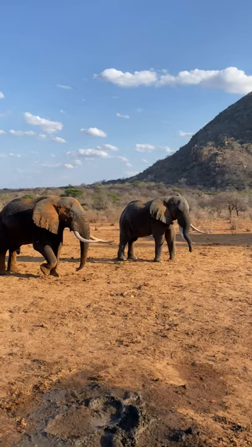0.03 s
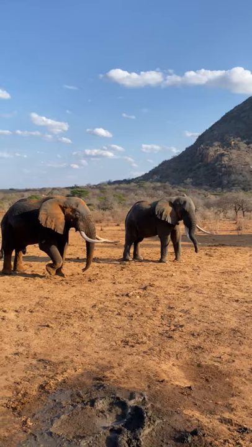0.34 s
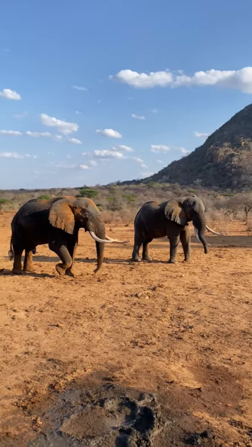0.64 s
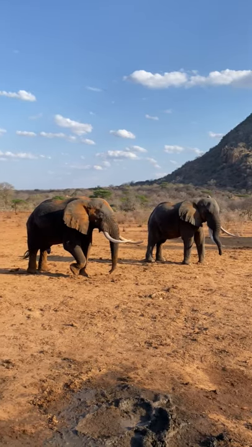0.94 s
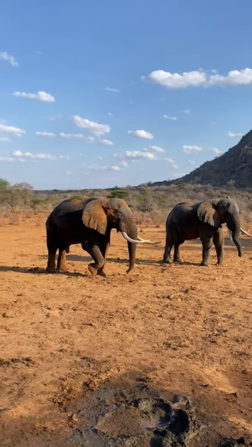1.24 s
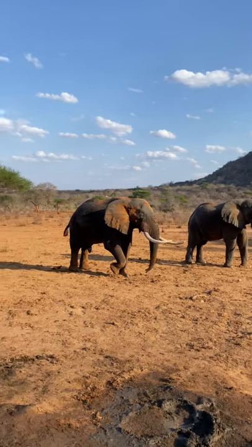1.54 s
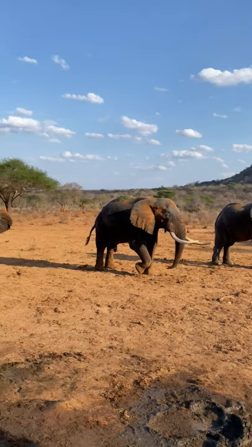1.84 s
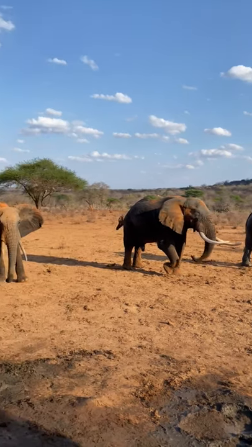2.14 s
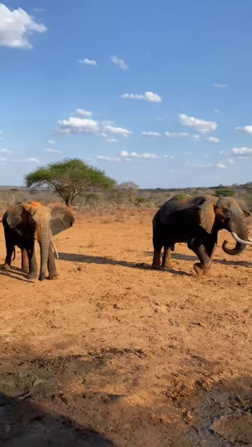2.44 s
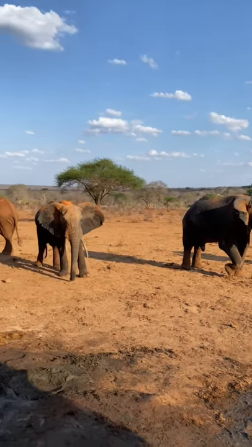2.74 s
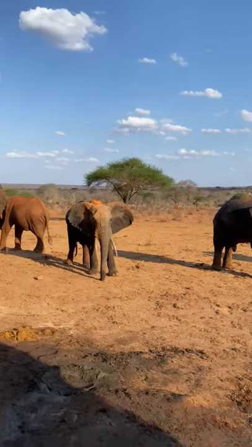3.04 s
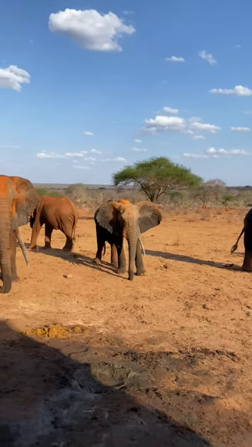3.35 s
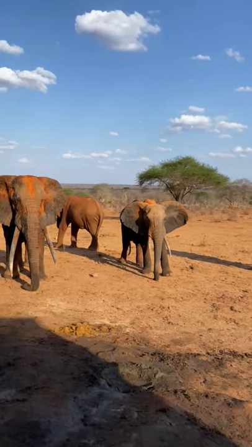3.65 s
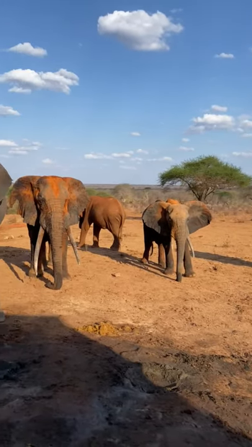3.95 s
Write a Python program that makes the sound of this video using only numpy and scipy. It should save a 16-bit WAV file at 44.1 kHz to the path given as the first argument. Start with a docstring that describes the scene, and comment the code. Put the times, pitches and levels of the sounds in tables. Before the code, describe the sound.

A steady stream of water splashes onto wet ground while wind buffets the microphone.

```python
"""The sound cuts in on a steady stream of water splashing onto wet ground in open, dry country with no walls to
echo: a fluttering spray of tiny impacts over a low churn of bubbles. From the start, gusts of wind buffet the
microphone. Single eddies soon thump it, heavier slaps of water land and a larger bubble plinks. From about 1.5
s small vortices rip across its two ports, and as it slowly turns the water grows brighter. One more bubble
plinks at the very end."""
import sys
import numpy as np
from scipy import signal
from scipy.fft import rfft, irfft
from scipy.io import wavfile

SR = 44100
rng = np.random.default_rng(int(sys.argv[2]) if len(sys.argv) > 2 else 0)


def transcribe(u):
    """Save the signal u as a 16-bit wav file named by the first command-line argument.

    u: samples, shape (n,) or (channels, n), limited to [-1, 1]; the rate is SR.
    q: integer samples, one column per channel.
    """
    v = np.clip(np.atleast_2d(u).T, -1, 1)
    q = np.round(v * 32767).astype(np.int16)
    wavfile.write(sys.argv[1], SR, q)


N = 176400
TIME, FREQS = np.arange(N) / SR, np.arange(N // 2 + 1) * SR / N


def from_db(db):
    """Decibels to gain."""
    return 10 ** (np.asarray(db) / 20)


def unit_rms(x):
    """Scale to unit rms."""
    return x / np.sqrt(np.mean(x ** 2) + 1e-20)


def automation(rows):
    """A control curve through (seconds, value) points."""
    return np.interp(TIME, *np.transpose(rows))


def over_hz(points):
    """A curve through (Hz, value) points across the spectrum, on a log axis."""
    hz, value = np.transpose(points)
    return np.interp(np.log(np.maximum(FREQS, 1)), np.log(hz), value)


def drift(rate_hz):
    """Smooth random modulation at unit rms."""
    return unit_rms(irfft(rfft(rng.standard_normal(N)) / (1 + (FREQS / rate_hz) ** 2), N))


def clicks(per_s, spread_db):
    """Random impacts, many small and a few large."""
    sizes = from_db(spread_db * np.minimum(rng.exponential(1, N), 4))
    return sizes * rng.choice([-1, 1], N) * (rng.random(N) < per_s / SR)


def grainy(per_s, spread_db, share):
    """Separate impacts carry a share of the power, over a smooth rush of countless small ones."""
    impacts = unit_rms(clicks(per_s, spread_db))
    return np.sqrt(share) * impacts + np.sqrt(1 - share) * rng.standard_normal(N)


def stereo(mid, side, correlation):
    """Left and right of a given correlation from two unrelated signals."""
    return np.sqrt((1 + correlation) / 2) * mid + np.sqrt((1 - correlation) / 2) * np.array([side, -side])


def bubbles(low_hz=380, high_hz=5500, pitches=36, ring_cycles=40):
    """Trapped air rings briefly, rising a little in pitch as it fades by 60 dB."""
    births = clicks(per_s=1000, spread_db=2)
    pitch_index = rng.integers(0, pitches, N)
    churn = np.zeros(N)
    for k, hz in enumerate(np.geomspace(low_hz, high_hz, pitches)):
        life = ring_cycles / hz
        t = np.arange(int(life * SR)) / SR
        ring = hz * np.sin(2 * np.pi * hz * t * (1 + 0.16 * t / life)) * np.exp(-np.log(1000) * t / life)
        churn += signal.oaconvolve(births * (pitch_index == k), ring)[:N]
    return unit_rms(churn) * np.sqrt(2 * high_hz / SR)


def flicker(sound, depth_db=1.0):
    """Each of six overlapping octave bands flickers on its own."""
    spectra = rfft(sound)
    octave = np.log2(np.clip(FREQS, 500, 16000) / 500)
    bands = [irfft(spectra * np.maximum(1 - np.abs(octave - k), 0), N) for k in range(6)]
    return sum(band * from_db(depth_db * drift(rate_hz=30)) for band in bands)


def splash(flutter_db=1.1, surge_db=0.2):
    """Spray and bubbles pulse as the stream breaks into lumps, with slaps on top: two unrelated spectra."""
    flow = from_db(flutter_db * drift(rate_hz=70) + surge_db * drift(rate_hz=12))
    grains = np.zeros((2, N))
    for layer in grains:
        spray = grainy(per_s=5000, spread_db=0.5, share=0.38)
        layer += spray + from_db(-5.5) * bubbles()
    return rfft(flicker(flow * grains + slaps())) * np.sqrt(SR / 2)


# The water's tone and stereo image. Each row: frequency in Hz, level in dB per Hz, left minus right in dB,
# phase lead of the left in radians, correlation, then the dB and the radians of lead a full turn adds.
WATER_IMAGE = [ (103, -84, 9, 1.5, 0.6, -6, 0.35), (280, -62.5, 1.5, -0.56, 0.56, -3.5, 0.29),
               (450, -62.5, 4, -.5, 0.97, 4.5, 1.4), (610, -62, 5, -0.65, 0.36, -2, -0.21),
               (817, -67, 8, 0.5, 0.08, 7.5, 0.19), (1366, -68.5, -1, .5, 0.78, 4, 1.12),
               (1735, -71.5, -2, 1.25, 0.7, 1.5, -0.13), (2040, -74.5, -2.5, 2.5, 0.38, 6, -0.26),
               (2364, -67.5, 5.5, 3, 0.5, 3, 0.67), (3090, -65.5, 2.5, 3.0, 0.93, -1, 1.35),
               (3610, -68, -1.5, 4.5, 0.5, 0.5, 1.46), (4320, -65, -1, 6.5, 1, 0.5, 0.97),
               (4650, -65, 2, 6, 0.88, -1.8, 0.022), (5244, -69, -3, 7.5, 0.85, 0, 1.37),
               (5750, -72, 1.5, 8, 0.92, 7, 1.1), (6500, -79.5, -1, 9, 0.74, 6.5, 0.24),
               (7550, -85.5, -1, 8.6, .8, 10, 0), (8100, -84.5, 0, 9.42, 1, 2, 0),
               (9300, -81.3, 0, 9.42, 1, 4, 0), (11000, -85.3, 0, 9.42, 1, 11.5, 0),
               (12000, -89.5, 0, 9.45, .95, 11, .95), (14000, -94.3, 0, 10.6, .45, 9.3, .1),
               (15000, -97, 0, 11.4, .4, 2, 0), ]
# The microphone's slow turn. Each row: time in seconds, share of the full turn.
MIC_TURN = [(0, 0), (1.3, .02), (2.0, .13), (2.4, .28), (2.7, .48), (3.1, .7), (3.4, .93), (4, 1.05)]


def water():
    """The splash reaches the two ports of a turning microphone, crossfading to a brighter tone."""
    curves = [over_hz(np.array(WATER_IMAGE)[:, [0, k]]) for k in range(1, 7)]
    level_db, balance_db, lead, correlation, turn_db, turn_lead = curves
    sides = np.array([[.5], [-.5]])
    ahead = stereo(*splash(), correlation) * from_db(level_db + sides * balance_db)
    ahead *= np.exp(1j * sides * lead)
    turned = ahead * from_db(turn_db) * np.exp(1j * sides * turn_lead)
    turn = automation(MIC_TURN)
    return (1 - turn) * irfft(ahead, N) + turn * irfft(turned, N)


# The rumble's EQ. Each row: frequency in Hz, relative level in dB.
WIND_EQ = [(15, -35.5), (28, -36), (45, -1), (65, 5), (100, 4), (160, 1), (260, -2.5), (420, -7.5),
           (750, -19.5), (1300, -32.5), (3000, -108.5)]
# The rumble's stereo image. Each row: frequency in Hz, left-right correlation (1 is mono).
WIND_CORRELATION = [(50, 1), (130, 0.93), (300, 0.8), (800, 0.94)]
# The gusts, as a fader ride. Each row: time in seconds, level in dB before the trim.
GUST_RIDE = [(0.1, -35), (0.15, -38), (0.21, -31), (0.5, -34), (0.63, -30), (0.67, -24.5), (0.72, -32.5),
             (1.0, -30.5), (1.07, -31), (1.125, -22.5), (1.28, -26), (1.39, -27), (1.415, -30),
             (1.46, -19.5), (1.54, -31.5), (1.62, -28), (1.75, -32), (1.83, -39.5), (2.02, -23),
             (2.15, -39.5), (2.19, -19.5), (2.23, -32), (2.26, -23.5), (2.33, -46), (2.38, -29),
             (2.55, -45), (2.575, -28), (2.64, -23.5), (2.69, -34), (2.725, -24), (2.81, -37.5),
             (2.84, -27), (2.87, -37), (2.91, -28), (2.96, -37.5), (3.14, -31.5), (3.17, -38.5),
             (3.3, -30.5), (3.42, -29.5), (3.46, -29.5), (3.49, -26.5), (3.52, -29), (3.55, -36),
             (3.61, -31), (3.64, -30.5), (3.73, -26), (3.85, -30), (3.91, -23), (3.96, -36), (4.0, -33)]


def wind(trim_db=-0.5):
    """Eddies tumble over the ports: a lumpy rumble that swells with each gust."""
    mid, side = [rfft(grainy(per_s=380, spread_db=3, share=0.58)) for _ in range(2)]
    eddies = stereo(mid, side, over_hz(WIND_CORRELATION))
    rumble = irfft(eddies * from_db(over_hz(WIND_EQ)), N)
    return unit_rms(rumble) * from_db(trim_db + automation(GUST_RIDE))


def swing(start, db, hz, swell_cycles, sag):
    """A short swing of pressure swells and dies away, its log pitch sinking by sag per cycle."""
    cycles = np.log1p(sag * np.maximum((TIME - start) * hz, 0)) / sag
    age = np.minimum(cycles / swell_cycles, 20)
    envelope = from_db(db) * (age * np.exp(1 - age)) ** 2
    return envelope * np.sin(2 * np.pi * (cycles + rng.random()))


# Wind thumps. Each row: start in seconds, peak in dB, starting pitch in Hz, attack in cycles.
EDDY_THUMPS = [(.222, -15, 427, 0.42), (.367, -16.5, 450, 0.68), (.670, -21, 149, 0.7),
               (.945, -16.5, 310, 0.62), (1.120, -28, 262, 1.1), (1.158, -23.5, 220, 0.5),
               (1.185, -19.5, 380, 1.2), (1.254, -14.5, 189, 0.59), (1.380, -14.5, 148, 0.37),
               (1.447, -16.5, 570, 0.81), (1.461, -19, 220, 0.48), (1.473, -16, 380, .7),
               (1.560, -11.5, 484, 0.5), (1.679, -15, 523, 0.57), (2.175, -15.5, 200, 1.1),
               (2.255, -16, 313, 0.64), (2.593, -19, 344, 0.75), (2.626, -16.5, 300, 1.14),
               (2.678, -25, 380, 1.5), (2.714, -15.5, 258, 0.76), (3.251, -15.5, 483, 0.68),
               (3.303, -15, 273, 0.64), (3.450, -11.5, 320, 0.97), (3.468, -14, 110, 0.62),
               (3.486, -9, 183, 0.65), (3.631, -9.5, 350, 0.76), (3.645, -17, 119, 0.55),
               (3.678, -15.5, 288, 1.2), (3.723, -20, 380, 0.76), (3.738, -17.5, 220, 0.3),
               (3.903, -16.5, 128, 0.74)]


def thumps():
    """Single eddies thump the microphone, diving in pitch as they slow."""
    return sum(swing(*thump, sag=0.25) for thump in EDDY_THUMPS)


# Accents in the splash. Each row: start in seconds, level in dB over the spray before the low cut.
WATER_SLAPS = [(0.415, 9), (0.511, -7.5), (0.584, 9), (0.998, 5.5), (1.037, 6.5), (1.21, 8.5), (1.844, 4),
               (2.071, 0.5), (2.089, 9.5), (2.143, 0), (2.315, 3), (2.778, -1), (3.065, -0.5),
               (3.388, -0.5)]


def slaps(decay_s=0.007, low_cut_hz=2600):
    """Heavier slaps of water land as bright ticks of noise."""
    envelope = sum(from_db(db) * (TIME >= start) * np.exp(-np.abs(TIME - start) / decay_s)
                   for start, db in WATER_SLAPS)
    low_cut = signal.butter(2, low_cut_hz, "high", fs=SR, output="sos")
    return signal.sosfilt(low_cut, envelope * rng.standard_normal((2, N)))


# Bubble plinks. Each row: start in seconds, peak in dB, starting pitch in Hz, attack in cycles.
BUBBLE_PLINKS = [(.832, -27.5, 1750, 4.9), (3.972, -25.5, 1060, 6.6)]


def plinks():
    """Larger bubbles ring out at an almost steady pitch."""
    return sum(swing(*plink, sag=0.002) for plink in BUBBLE_PLINKS)


# Wind rips. Each row: start in seconds, hold in seconds, level in dB, top of the band in Hz.
VORTEX_RIPS = [(1.562, 0.05, -34, 500), (2.05, 0.064, -30, 595), (2.083, 0.0064, -24, 1490),
               (3.455, 0.015, -20, 830), (3.496, 0.0049, -23, 735), (3.51, 0.061, -32, 450),
               (3.864, 0.01, -27, 650)]


def rips(fade_s=0.0062, low_cut_hz=110):
    """Vortices smaller than the port spacing push the two sides apart: short, wide, rasping flaps."""
    flaps = np.zeros((2, N))
    for start, hold, db, top_hz in VORTEX_RIPS:
        outside_s = np.maximum(np.maximum(start - TIME, TIME - start - hold), 0)
        band = signal.butter(3, [low_cut_hz, top_hz], "band", fs=SR, output="sos")
        swirl = unit_rms(signal.sosfilt(band, rng.standard_normal((2, N))))
        flaps += from_db(db) * np.exp(-outside_s / fade_s) * stereo(*swirl, correlation=-0.91)
    return flaps


def scene():
    """Splashing water, with wind on the microphone."""
    return water() + plinks() + wind() + thumps() + rips()


def record(dry):
    """The sound cuts in hard, and a steep high cut takes off the very top."""
    start_s, stopband_hz = 0.085, 16200
    high_cut = signal.cheby2(12, 60, stopband_hz, fs=SR, output="sos")
    return signal.sosfilt(high_cut, dry * (TIME >= start_s))


dry = scene()
out = record(dry)
transcribe(out)
```